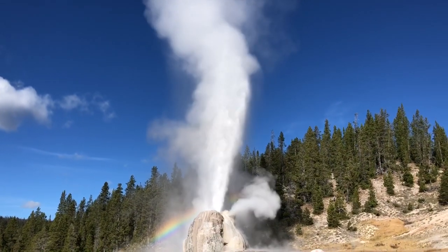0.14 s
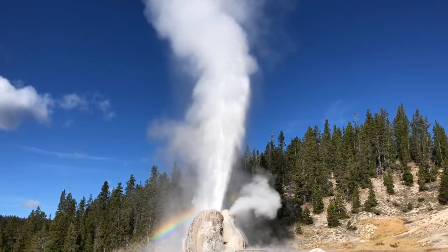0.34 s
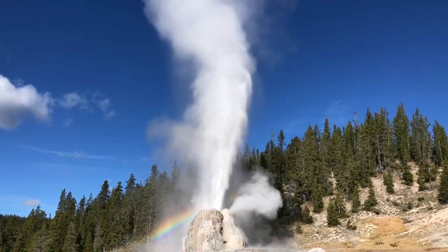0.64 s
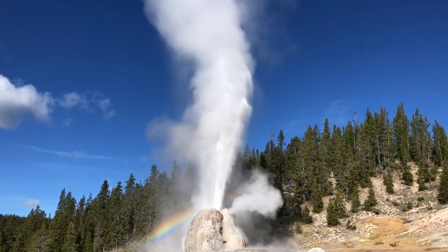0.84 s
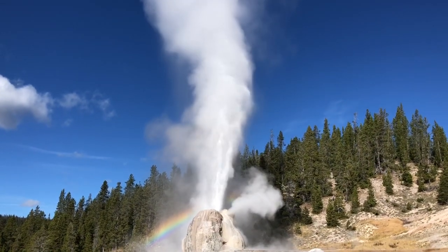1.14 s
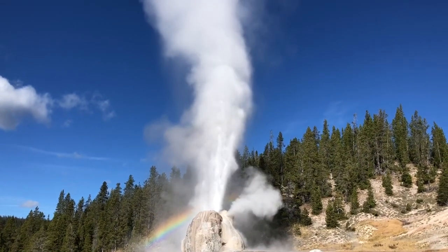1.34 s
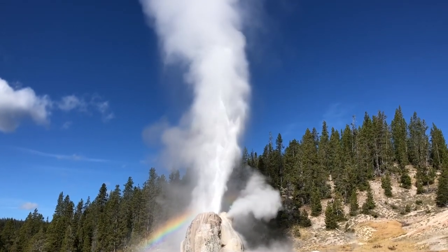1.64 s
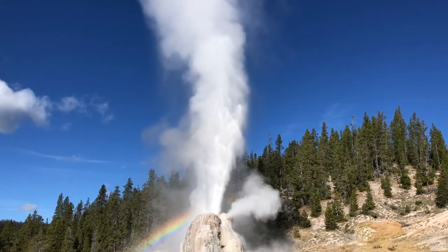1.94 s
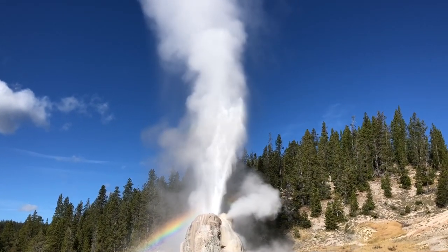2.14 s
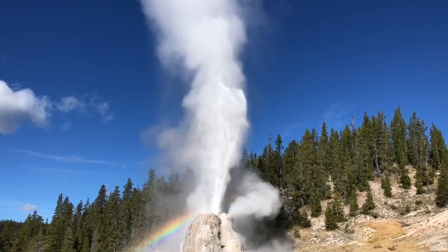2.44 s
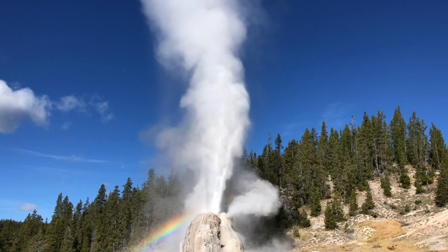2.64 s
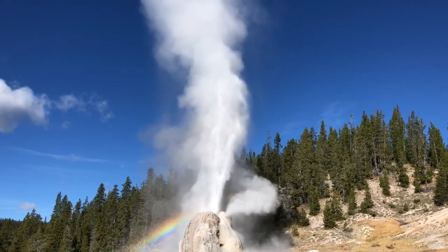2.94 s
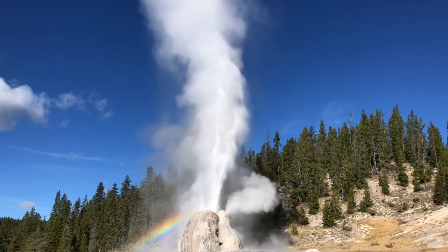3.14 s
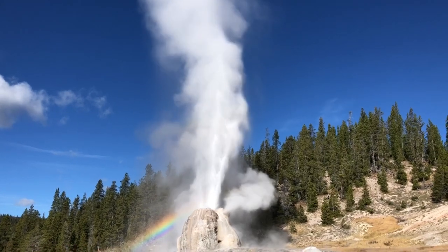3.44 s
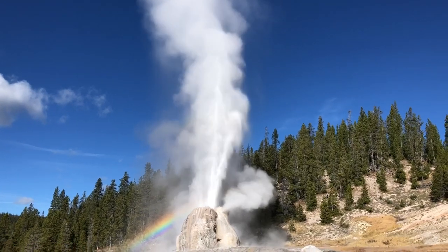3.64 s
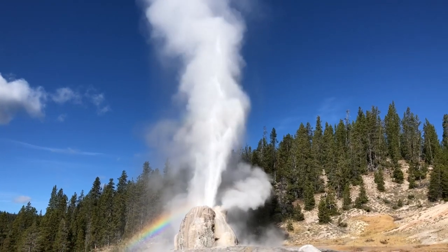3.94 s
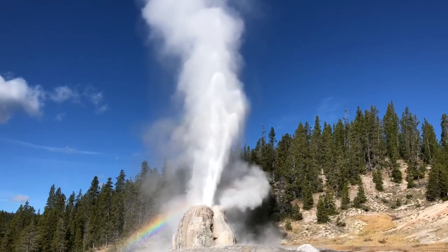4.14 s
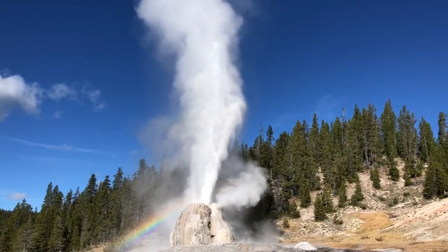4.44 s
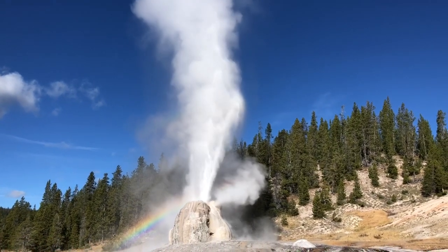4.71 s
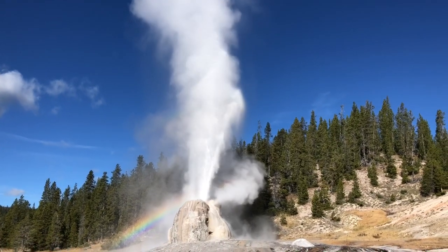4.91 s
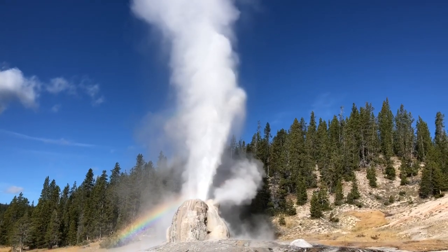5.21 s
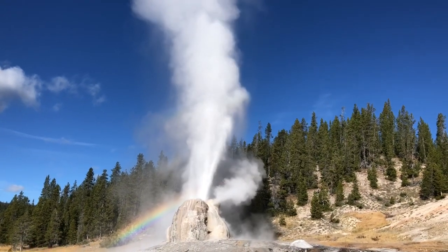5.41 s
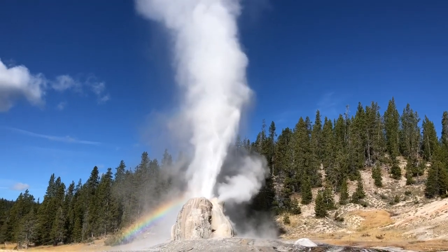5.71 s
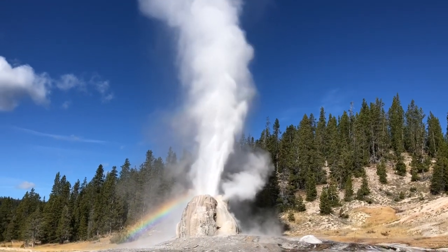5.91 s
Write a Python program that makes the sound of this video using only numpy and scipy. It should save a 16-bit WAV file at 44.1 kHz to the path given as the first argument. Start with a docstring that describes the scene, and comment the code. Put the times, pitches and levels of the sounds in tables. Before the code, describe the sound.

A geyser roars steadily outdoors, a deep, bassy rush of water and steam with a softer hiss on top and small uneven surges.

```python
"""Geyser blowing water and steam

The jet roars low and hisses high: noise is coloured, split into bands, and each band's level is modulated.
Slugs of water swell the low and middle bands, spurts of spray chiefly the high ones.
Filtered echoes off the open ground comb the spectrum by interference.
A faint whistle, made of two sine sweeps, glides up and then down once."""
import sys
import numpy as np
from scipy import signal
from scipy.fft import rfft, irfft, next_fast_len
from scipy.io import wavfile
from scipy.ndimage import uniform_filter1d, map_coordinates

SR = 44100
rng = np.random.default_rng(int(sys.argv[2]) if len(sys.argv) > 2 else 0)


def to_wav(s):
    """Save 16-bit WAV."""
    ch = np.atleast_2d(s).T  # columns
    pcm = np.round(np.clip(ch, -1, 1) * 32767)  # PCM
    wavfile.write(sys.argv[1], SR, pcm.astype(np.int16))


N = 267687

# How each spectral region follows the jet: (centre [Hz], response to flow [dB per dB],
# share of a slug's roar [ratio], share of the rush [ratio], share of a spurt [ratio])
REGIONS = [(149, 0.43, .96, 0, 0), (300, .4, 0.55, 0.67, 0.095), (600, 0.5, .1, 1.2, 0.27),
           (1000, .2, 0.041, 0.75, .4), (1800, 0.4, 0.062, 0.47, .7), (3300, 0.5, 0.11, 0.065, .9),
           (8000, 1.13, 0, .02, 0.6), (12000, 1.2, 0, .1, .7), (16000, 1.3, 0, .1, .6)]


def undb(db):
    """Decibel law: 20 dB is a factor of ten in amplitude."""
    return 10 ** (np.asarray(db) / 20)


def walk(rate):
    """Band-limited random modulation: levels held 1 / rate seconds, averaged twice, scaled to unit spread."""
    hold = int(SR / rate)
    steps = np.repeat(rng.standard_normal(N // hold + 1), hold)
    smooth = uniform_filter1d(uniform_filter1d(steps, hold), hold)[:N]
    return smooth / smooth.std()


def swell(t, peak_s, length_s):
    """Gaussian pulse envelopes, one row per event; the length is four standard deviations."""
    return np.exp(-0.5 * (4 * (t - peak_s[:, None]) / length_s) ** 2)


def swings(flow_lag_s=0.05, spurt_s=0.03):
    """Linear superposition of level swings [dB]: each region weights the flow, slugs, rush and spurts."""
    # Force of the jet, as the level of its spray; only departures from the mean count: (time [s], level [dB])
    flow_levels = [(0.0, -50), (0.03, -51), (0.37, -53), (0.59, -51.5), (0.94, -57.5), (1.01, -54.5),
                   (1.17, -54.5), (1.18, -56), (1.79, -53.5), (2.03, -54.5), (2.04, -54), (2.4, -52.5),
                   (2.42, -53.5), (3.26, -55), (3.36, -57), (3.57, -55), (4.14, -53.5), (4.19, -51),
                   (4.53, -51.5), (4.6, -52.5), (4.97, -53.5), (5.24, -51), (5.93, -53), (6.07, -52)]
    # Slugs of water bursting from the vent, before each region's share:
    # (peak time [s], length [s], roar swell [dB], rush swell [dB])
    slug_events = [(0.07, 0.21, 4, -1.5), (0.17, 0.36, 1, 3.5), (0.264, 0.081, 4, 2.5),
                   (.53, 0.27, 6.5, 2.5), (0.625, .15, -0.5, 1.5), (1.858, 0.31, 4, 3),
                   (2.344, 0.18, 2, 2.5), (3.707, 0.48, -1.5, 1), (4.24, 0.26, 1, 1.5),
                   (4.377, 0.36, 6, 0.5), (4.445, 0.14, 1.5, 3.5), (4.83, .15, 1.5, 1.2),
                   (5.065, 0.17, 4.5, -2), (5.26, 0.11, 4.5, 3), (5.424, 0.32, 1, 0),
                   (5.824, 0.069, 2, 2.5)]
    # Strongest short spurts of spray, before each region's share: (peak time [s], swell [dB])
    spurt_events = [(1.375, 3.5), (1.557, 2.5), (2.314, 1.5), (3.704, 2.4), (4.428, 3)]
    # Slow level of the middle rush, before each region's share: (time [s], level [dB])
    rush_levels = [(0, 1), (.8, -1), (1.2, -1), (1.6, 0), (2.05, -.5), (2.8, -0.5), (3.3, -1.5),
                   (3.9, -0.5), (4.6, 0), (4.95, 0), (5.3, 1), (5.65, 0), (6.07, -1.5)]

    t = np.arange(N) / SR
    # the column evens out sudden changes of flow
    flow = uniform_filter1d(np.interp(t, *np.transpose(flow_levels)), int(flow_lag_s * SR))
    peak_s, length_s, roar_db, rush_db = np.transpose(slug_events)
    slugs = swell(t, peak_s, length_s[:, None])
    roar = roar_db @ slugs
    rush = rush_db @ slugs + np.interp(t, *np.transpose(rush_levels))
    peak_s, spurt_db = np.transpose(spurt_events)
    spurts = spurt_db @ swell(t, peak_s, spurt_s)
    weights = np.transpose(REGIONS)[1:].T
    return weights @ np.array([flow - flow.mean(), roar, rush, spurts])


def jet(puff_db=0.25, sputter_db=0.71,  # spread at the top region, falling to none at the lowest
        flicker_db=0.5, patter_db=0.62,  # spread, drawn afresh for each band
        spurt=0.64,  # skew of the puffs
        gust_db=0.46, gust_hz=1000, gust_octaves=1.5,  # spread at the centre, centre, reach
        flutter_db=1.0, flutter_hz=300):  # spread at the centre, centre
    """Turbulent jet noise: eddies of many sizes give a broad spectrum whose bands fluctuate partly together."""
    # Spectrum of the jet before the overall level is set: (frequency [Hz], relative density [dB per Hz])
    jet_colour = [(20, -25), (34, -19.5), (55, -3.5), (85, -0.5), (150, -3.5), (210, -7.5), (300, -10),
                  (420, -12), (700, -19.0), (1230, -23), (1600, -24.5), (1900, -26), (2300, -27),
                  (3000, -28), (4300, -28), (5300, -33.5), (9500, -37.5), (11500, -44.5), (13700, -51),
                  (15600, -53)]

    surge = swings()
    size = next_fast_len(N)
    octave = np.log2(np.arange(1, size // 2 + 2) * SR / size)  # octaves above 1 Hz
    hz, colour_db = np.transpose(jet_colour)
    colour = undb(np.interp(octave, np.log2(hz), colour_db))
    noise = rfft(rng.standard_normal(size)) * colour

    sputter, gust, flutter = walk(90), walk(10), walk(30)
    puff = np.exp(spurt * walk(23.95))  # puffs jump up in short spurts more than they sag
    puff = (puff - puff.mean()) / puff.std()

    region_octave = np.log2(np.transpose(REGIONS)[0])
    last = len(REGIONS) - 1
    out = 0
    for centre in np.arange(4, 14.6, 0.5):
        # neighbouring bands crossfade so that their weights add to one
        weight = np.cos(np.pi * np.clip(octave - centre, -0.5, 0.5)) ** 2
        band = irfft(noise * weight, size)[:N]
        place = np.interp(centre, region_octave, np.arange(last + 1))
        low = min(int(place), last - 1)
        db = surge[low] + (place - low) * (surge[low + 1] - surge[low])
        # small eddies react at once to each puff, the big ones of the plume average it out
        db = db + place / last * (puff_db * puff + sputter_db * sputter)
        db = db + flicker_db * walk(7.1) + patter_db * walk(2 ** centre / 80)
        gust_reach = np.exp(-((centre - np.log2(gust_hz)) / gust_octaves) ** 2)
        flutter_reach = np.exp(-(centre - np.log2(flutter_hz)) ** 2 / 2)
        db = db + gust_db * gust * gust_reach + flutter_db * flutter * flutter_reach
        out = out + band * undb(db)
    return out


def ground(direct, wander_ms=0.027, smear_ms=0.063):
    """Comb-filter interference: dull echoes creep in lag as the listener shifts and wander as the column sways."""
    # Echoes off the ground, inverted where the share is negative:
    # (lag at the start [ms], lag at the end [ms], pressure share before the low-pass [ratio], treble edge [Hz])
    echo_paths = [(1.18, 1.157, 0.53, 1200), (3.29, 3.52, -0.36, 590), (2.124, 2.42, -0.5, 600)]

    taps = np.arange(-40, 41)
    smear = np.exp(-0.5 * (taps / (smear_ms * SR / 1000)) ** 2)  # spread of lags over the column's height
    smear = smear / smear.sum()
    out = direct
    for start_ms, end_ms, share, edge_hz in echo_paths:
        lag_ms = np.linspace(start_ms, end_ms, N) + wander_ms * walk(3.035)
        source_index = np.arange(N) - lag_ms * SR / 1000
        echo = map_coordinates(direct, [source_index], order=3, mode="mirror")
        echo = np.convolve(echo, smear, "same")
        out = out + share * signal.lfilter(*signal.butter(1, edge_hz, fs=SR), echo)
    return out


def whistle(waver_hz=18, waver_db=2):
    """Frequency modulation: phase is the running integral of a gliding, wavering pitch, under soft ends."""
    # Glides, before the waver: (start [s], end [s], from [Hz], to [Hz], amplitude before the soft ends [dB])
    glides = [(0.785, 0.865, 680, 940, -55), (.885, .985, 1370, 860, -60)]

    out = np.zeros(N)
    pitch_waver = waver_hz * walk(59.6)
    level_waver = undb(waver_db * walk(51.7))
    for start, end, from_hz, to_hz, db in glides:
        i = np.arange(int(start * SR), int(end * SR))
        pitch = np.linspace(from_hz, to_hz, len(i)) + pitch_waver[i]
        phase = 2 * np.pi * np.cumsum(pitch) / SR
        soft_ends = np.sqrt(2 * np.hanning(len(i)))  # mean square of one
        out[i] = undb(db) * level_waver[i] * soft_ends * np.sin(phase)
    return out


def scene(jet_db=-30.5):
    """Superposition of pressures: the jet with its echoes, set to an RMS level [dB], plus the whistle."""
    roar = ground(jet())
    roar = roar * undb(jet_db) / roar.std()
    return (roar + whistle())[None]


def record(dry, bass_hz=33.0, top_hz=15680):
    """Band limiting: a high-pass thins the deepest bass and a steep elliptic low-pass cuts the top."""
    high_pass = signal.butter(3, bass_hz, "high", fs=SR, output="sos")
    low_pass = signal.ellip(12, 0.2, 80, top_hz, fs=SR, output="sos")  # ripple 0.2 dB, stop band 80 dB down
    return signal.sosfilt(low_pass, signal.sosfilt(high_pass, dry))


dry = scene()
out = record(dry)
to_wav(out)
```